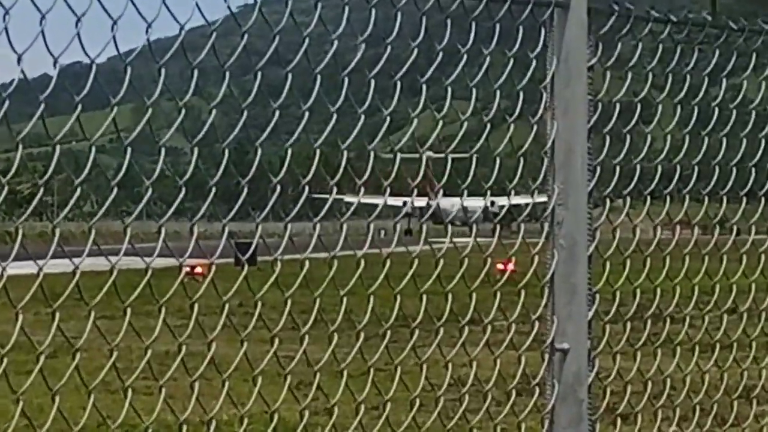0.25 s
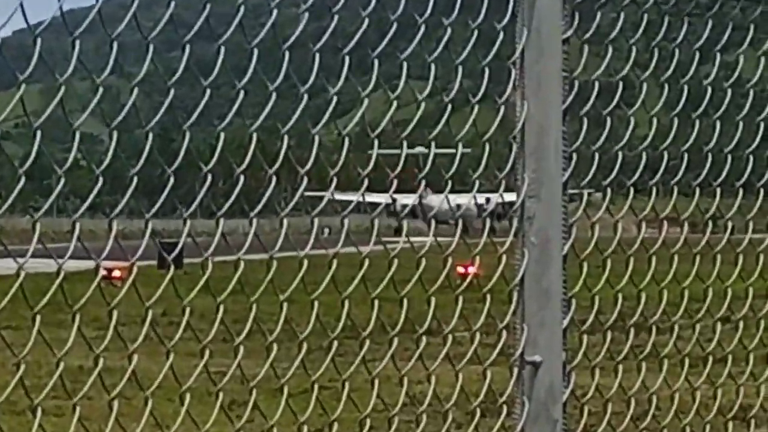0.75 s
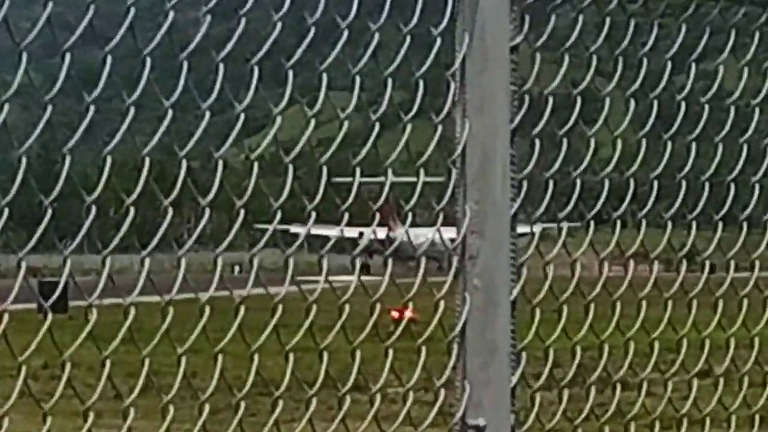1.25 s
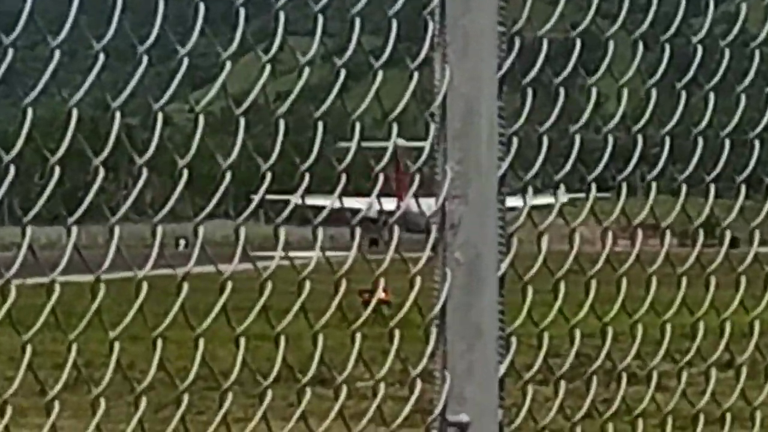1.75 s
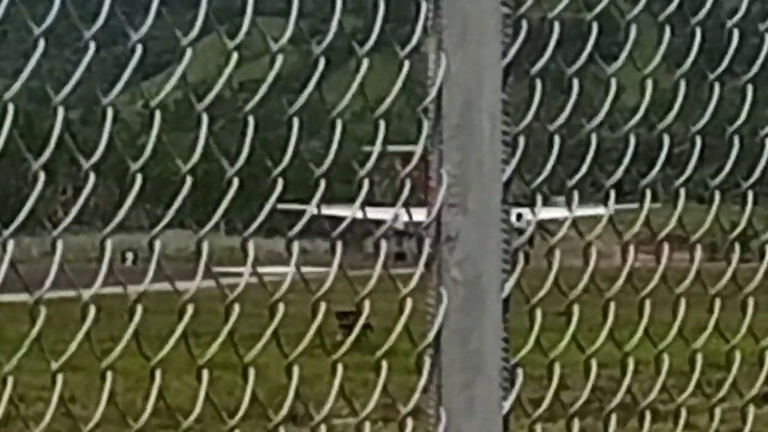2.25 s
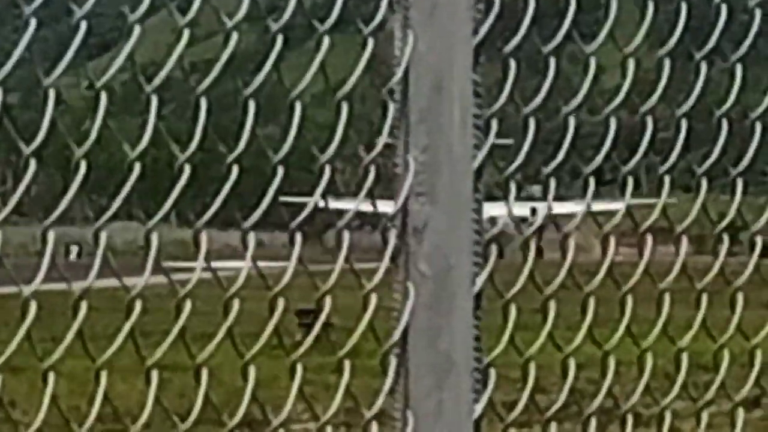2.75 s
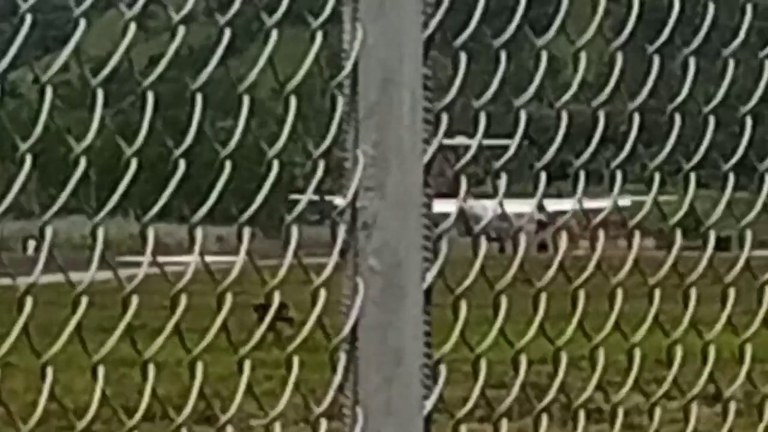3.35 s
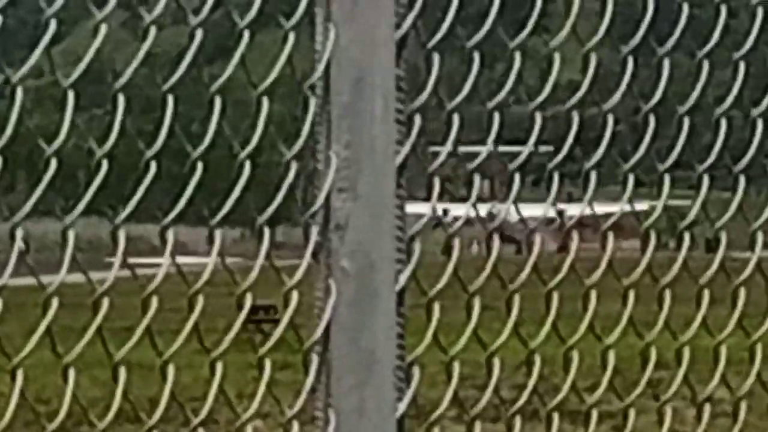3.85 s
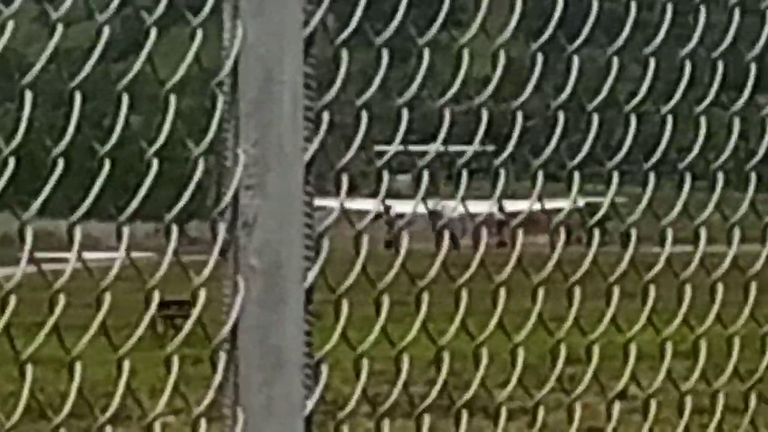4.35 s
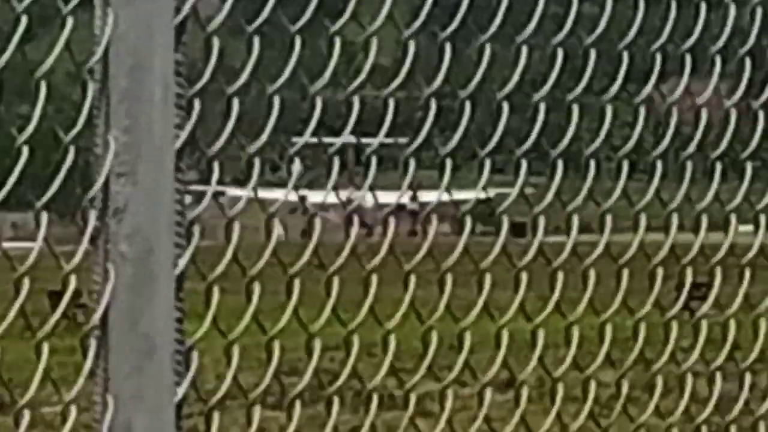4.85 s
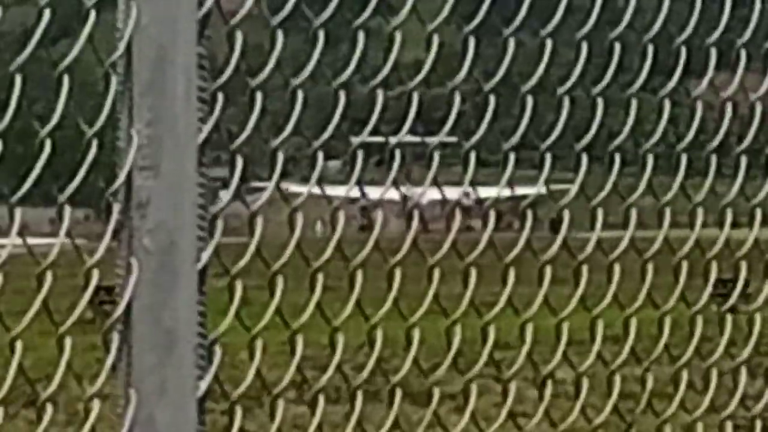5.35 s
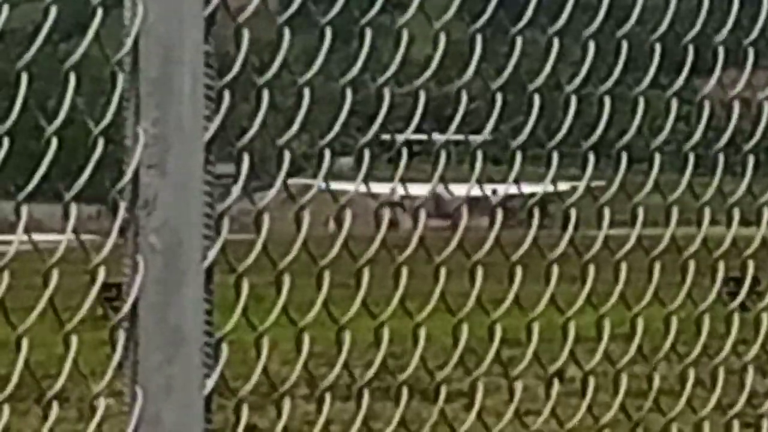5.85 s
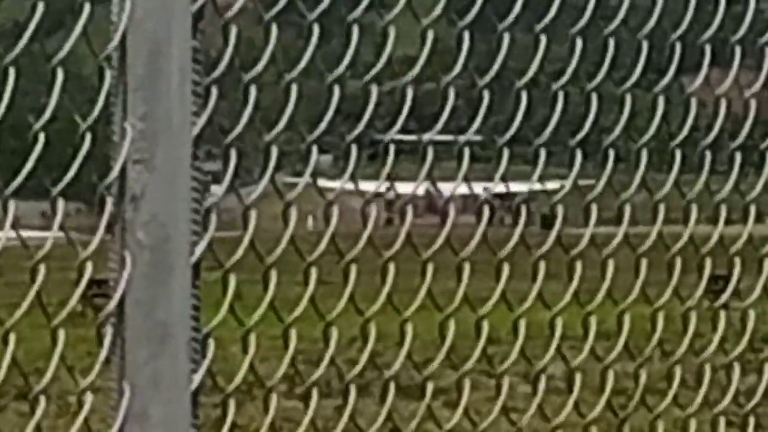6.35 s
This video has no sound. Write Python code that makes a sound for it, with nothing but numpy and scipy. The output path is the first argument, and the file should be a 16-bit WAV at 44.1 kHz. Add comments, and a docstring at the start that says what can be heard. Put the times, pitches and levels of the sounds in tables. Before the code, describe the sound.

An airliner's engines run on a runway, heard outdoors from the airfield fence, starting as a moderate, hissing drone over a faint breeze. At about 0.6 seconds a short gust bumps the microphone. From 1 second the engines swell quickly as the aircraft swings its tail round, reaching a loud peak near 1.8 seconds with a broad roar, a hollow howl and a deep boom. The higher roar drops back first, while the heavy rumble holds until about 2.5 seconds. The sound then slowly weakens and dulls as the aircraft rolls away, settling by about 5 seconds into a steady drone with small low throbs. A small bird gives a few very faint, thin chips, scattered through the first 5 seconds. A faint, wavering distant hum rises briefly at around 6.4 seconds, just before the end.

```python
"""An airliner swings its tail round on the runway and rolls away, heard from behind the airfield fence.
Turbulent mixing in the exhaust radiates noise that is beamed along the jet, so the roar swells as the
jet sweeps past, treble first and rumble last, then dulls with distance. A reflection interferes with
the direct sound and combs the roar. A breeze and one gust rush at the microphone, a small bird chips
faintly in the grass, and a distant hum rises briefly at the end."""
import sys
import numpy as np
from scipy import signal
from scipy.io import wavfile
from scipy.ndimage import uniform_filter1d

SR = 44100
rng = np.random.default_rng(int(sys.argv[2]) if len(sys.argv) > 2 else 0)


def bounce(signal):
    """Save signal as a 16-bit WAV file at the path given by the first command-line argument."""
    frames = np.transpose(np.atleast_2d(signal))
    limited = np.clip(frames, -1, 1)
    pcm = np.round(limited * 32767).astype(np.int16)
    wavfile.write(sys.argv[1], SR, pcm)


N = 290619
TIME = np.arange(N) / SR
TURN_S, TURN_SCALE_S = 1.4, 0.32  # midpoint and time scale of the tail's swing

# Spectral shapes of the noises: frequency_hz, relative_db
BREEZE_SPECTRUM = [(15, -22.5), (36, -20.5), (55, 1.5), (75, 4), (150, -8.5), (400, -21.5), (800, -40),
                   (3000, -120)]
RUMBLE_SPECTRUM = [(11, -46.5), (20, -26.5), (38, -32.5), (50, -26.5), (64, -12), (80, 9.5), (100, 6),
                   (135, 12), (175, 4.5), (215, -7.5), (300, -58), (700, -120)]
BODY_SPECTRUM = [(30, -57.5), (120, -28), (170, -3), (205, -0.5), (255, -3.5), (320, -8.5), (400, -12),
                 (520, -17.5), (900, -60), (2500, -120)]
HISS_SPECTRUM = [(1200, -10.5), (2300, 2.5), (2850, 1), (3100, -3.5), (3500, -6.5), (3900, -7.5),
                 (4400, -12), (5000, -15.5), (5500, -22), (6200, -29.5), (7500, -31.5), (8100, -35)]
ROAR_SPECTRUM = [(200, -19.5), (330, -8), (450, -6), (620, -8), (850, -7.5), (1050, -2), (1340, -2.5),
                 (1700, -4.5), (2000, -5), (2250, -3.5), (2520, -14.5), (2850, -13.5), (3150, -24),
                 (3800, -50.5), (5000, -92)]
# Distant hum: time_s, pitch_hz, level_db
HUM_CURVE = [(6.2, 326, -52.5), (6.29, 313.4, -49), (6.37, 320, -45.5), (6.44, 350, -38.5),
             (6.5, 317.6, -39), (6.56, 306, -55)]
# Bird chips and gust bumps: centre_s, peak_db, pitch_hz, half_length_s
BIRD_CHIPS = [(.135, -57, 5900, .012), (.38, -62.5, 5760, 0.036), (.683, -47, 5970, 0.0039),
              (.84, -55, 5930, .004), (2.42, -56, 5980, 0.005), (2.59, -57, 6050, .006),
              (3.17, -63, 6030, .006), (3.77, -64, 5900, .006), (4.267, -61, 6020, .008),
              (4.316, -72, 5960, 0.0044), (4.644, -63, 5950, 0.0055)]
GUST_BUMPS = [(.586, -40, 100, .012), (.6205, -14, 159, 0.0072), (.627, -31.5, 290, 0.0098),
              (.662, -21, 120, 0.0062)]
# Sweep of the low, beamed sounds past the listener:
# peak_s, peak_db, hold_s, rise_db_per_s, fall_db_per_s, before_db, after_db
RUMBLE_SWEEP = (1.76, -15.5, 0.66, 33.5, 7.8, -35.5, -31)
BODY_SWEEP = (1.8, -19.5, -0.01, 35.5, 8.5, -43.5, -44)
# Brief swells of the rumble: centre_s, gain_db
RUMBLE_SURGES = [(.2, 6), (.27, 11), (.37, 8), (1.85, 4.5), (2.49, 2.5), (3.24, 4.5), (4.24, 5.5),
                 (4.729, 4.5), (5.25, 9), (5.379, 8), (5.78, 4.5), (6.02, 9), (6.55, 6.5)]
# Resonance of the boom, highest in the turn: time_s, pitch_hz
BOOM_PITCH = [(0, 105), (.9, 111), (1.35, 142.4), (1.8, 125.2), (2.2, 111.5), (2.5, 109.4), (3.2, 103.3),
              (3.7, 97.8), (5.4, 98.4), (6.59, 105.6)]
# Part of the rumble's power that lies in the boom: time_s, power_fraction
BOOM_FRACTION = [(0, 0.7), (1, 0.06), (1.7, 0.79), (2.05, 0.3), (2.4, 1), (2.8, 0.4), (3.2, 0.82), (4, 0.4),
                 (6.59, .2)]
# Narrow peaks and notches in the treble: centre_hz, half_width_hz, gain_db
TREBLE_BANDS = [(2870, 210, 1), (3000, 120, -1.5), (3880, 67, -3), (4360, 160, 3.5), (4700, 90, -1.5),
                (4950, 160, 1)]
# Band that the soft grass absorbs, lifted instead far down the runway: time_s, gain_db
GROUND_BAND_GAIN = [(0, -6), (.6, -9), (1, -4), (1.5, -0.5), (2.2, -5.5), (3, -4.5), (4, -4.5), (4.8, -5),
                    (5.5, 4), (6.59, 7)]
# Centre of the hollow howl: time_s, pitch_hz
HOWL_PITCH = [(0, 730), (.5, 794), (.8, 720), (1.15, 750), (1.72, 710), (2.1, 760), (3.1, 759), (4.2, 807),
              (4.8, 775), (6.59, 780)]
# Envelopes of the howl and the broad roar: time_s, relative_db
HOWL_ENVELOPE = [(0, -43.5), (.55, -39.5), (1.15, -30), (1.72, -18), (2.1, -30), (2.75, -34.5),
                 (3.65, -30.5), (4.25, -32), (5.15, -41), (6.0, -37.5), (6.59, -38)]
ROAR_ENVELOPE = [(0, -39.5), (.25, -36), (.72, -35), (1.15, -26), (1.45, -21), (1.78, -19), (2.05, -24.5),
                 (2.25, -24), (3, -30.5), (3.65, -31), (4.3, -36), (4.8, -33.5), (5.4, -35), (5.9, -37.5),
                 (6.59, -38.5)]


def amplitude(db):
    """Amplitude grows tenfold for every 20 dB."""
    return 10 ** (np.asarray(db) / 20)


def unit_rms(x):
    """Normalisation to unit mean power."""
    return x / np.sqrt(np.mean(x ** 2) + 1e-20)


def bell(x, centre, half_width):
    """A Gaussian, falling to 1/e at half_width from its centre."""
    return np.exp(-((x - centre) / half_width) ** 2)


def follow(rows, t):
    """Linear interpolation of a table's columns at times t."""
    times, *columns = np.transpose(rows)
    return [np.interp(t, times, column) for column in columns]


def spectral_gain(spectrum, hz):
    """Interpolation of a spectrum in decibels over log frequency, returned as amplitude."""
    points_hz, db = np.transpose(spectrum)
    return amplitude(np.interp(np.log(hz + 1), np.log(points_hz), db))


def grid(size):
    """Frame times (a column) and bin frequencies of a short-time Fourier transform."""
    hop = size // 4
    return np.arange(N // hop + 5)[:, None] * hop / SR, np.fft.rfftfreq(size, 1 / SR)


def unit_band(gain, hz, low_hz, high_hz):
    """Normalisation of a spectrum so that its noise has unit power within one band."""
    in_band = (hz > low_hz) & (hz < high_hz)
    return gain / np.sqrt(np.mean(gain ** 2 * in_band, axis=-1, keepdims=True))


def shaped_noise(gain):
    """Spectral weighting of white noise by gain (frames x bins)."""
    size = 2 * (gain.shape[1] - 1)
    frames = dict(nperseg=size, noverlap=size - size // 4)
    white = signal.stft(rng.standard_normal(N + 2 * size), **frames)[2][:, :len(gain)]
    return signal.istft(white * gain.T, **frames)[1][:N]


def stationary_noise(spectrum, size):
    """Stationary noise: a constant spectrum, at unit rms."""
    t, hz = grid(size)
    return unit_rms(shaped_noise(spectral_gain(spectrum, hz) * np.ones_like(t)))


def random_field(shape, frames, bins):
    """Moving averages correlate a random field over time and frequency; unit rms."""
    smooth_in_time = uniform_filter1d(rng.standard_normal(shape), frames, axis=0)
    return unit_rms(uniform_filter1d(smooth_in_time, bins, axis=1))


def steadied(x, amount, samples):
    """Envelope compression takes a share of the slow chance swings out of a narrow noise."""
    power = abs(uniform_filter1d(uniform_filter1d(x ** 2, samples), samples)) + 1e-12
    return unit_rms(x / power ** (amount / 2))


def resonate(x, hz, width_hz):
    """A moving resonance by heterodyning: shift hz down to zero, smooth twice, shift back."""
    carrier = np.exp(2j * np.pi * np.cumsum(hz) / SR)
    pole = np.exp(-np.pi * width_hz / SR)
    baseband = signal.lfilter([1], np.poly([pole, pole]), x / carrier)
    return unit_rms((carrier * baseband).real)


def high_pass(x, edge_hz):
    """A fourth-order filter falls 24 dB per octave below its edge."""
    return signal.sosfilt(signal.butter(4, edge_hz, "high", fs=SR, output="sos"), x)


def tone_bursts(rows):
    """Wave packets: one sinusoid under a Gaussian envelope for each row."""
    return sum(amplitude(db) * bell(TIME, centre_s, half_s) * np.sin(2 * np.pi * hz * (centre_s - TIME))
               for centre_s, db, hz, half_s in rows)


def breeze(level_db=-49):
    """Air flowing past the microphone makes faint, steady low-frequency pressure noise."""
    return amplitude(level_db) * stationary_noise(BREEZE_SPECTRUM, size=4096)


def hum():
    """A distant pure tone wavers by frequency modulation: its phase is the integral of its pitch."""
    pitch_hz, level_db = follow(HUM_CURVE, TIME)
    tone = np.sqrt(2) * np.sin(2 * np.pi * np.cumsum(pitch_hz) / SR)
    return amplitude(level_db) * (TIME > HUM_CURVE[0][0]) * tone


def bird(echo_db=-6, t60_s=.25):
    """Scattering from the field gives a bird's thin chips an exponentially decaying tail."""
    t = TIME[:SR // 2]
    tail = rng.standard_normal(len(t)) * amplitude(-60 * t / t60_s)
    chips = tone_bursts(BIRD_CHIPS)
    return chips + amplitude(echo_db) * signal.fftconvolve(chips, tail / np.linalg.norm(tail))[:N]


def gust(rush_db=-30, peak_s=0.638, half_length_s=0.082, centre_hz=170, half_width_hz=130):
    """Pressure fluctuations of a puff on the microphone: a soft rush with a few low bumps."""
    t, hz = grid(size=1024)
    rush = unit_rms(shaped_noise(bell(hz, centre_hz, half_width_hz) * np.ones_like(t)))
    return amplitude(rush_db) * bell(TIME, peak_s, half_length_s) * rush + tone_bursts(GUST_BUMPS)


def turned(t):
    """Source orientation: how far the tail has swung towards the listener, from 0 to 1."""
    return .5 + .5 * np.tanh((t - TURN_S) / TURN_SCALE_S)


def beam_db(t, peak_s, peak_db, hold_s, rise_db_per_s, fall_db_per_s, before_db, after_db):
    """Directivity: the passing jet gives a swell, which adds in power to a drone."""
    approach_db = rise_db_per_s * np.maximum(peak_s - t, 0)
    departure_db = fall_db_per_s * np.maximum(t - peak_s - hold_s, 0)
    swell = amplitude(peak_db - approach_db - departure_db)
    drone = amplitude(before_db + (after_db - before_db) * turned(t))
    return 20 * np.log10(np.hypot(swell, drone))


def throb_db(spread_db=1.5, surge_half_s=0.024):
    """Amplitude modulation of the rumble: random throbbing and a few stronger surges."""
    t, _ = grid(size=4096)
    chance_db = spread_db * random_field(t.shape, frames=2, bins=1)[:, 0]
    surges_db = sum(db * bell(TIME, centre_s, surge_half_s) for centre_s, db in RUMBLE_SURGES)
    return np.interp(TIME, t[:, 0], chance_db) + surges_db


def shimmer(t, hz, patch_db=1., swirl_db=1.33, flutter_db=0.39):
    """Scintillation: moving air on the path varies the gain, over constant treble peaks and notches."""
    shape = len(t), len(hz)
    bands = sum(db * bell(hz, centre, half_width) for centre, half_width, db in TREBLE_BANDS)
    quick_patches = patch_db * random_field(shape, frames=10, bins=7)
    slow_swirl = swirl_db * random_field(shape, frames=55, bins=4)
    flutter = flutter_db * random_field(t.shape, frames=8, bins=1)
    return amplitude(bands + quick_patches + slow_swirl + flutter)


def hiss(gain_db=-12.0, turn_db=-3.5, doubling_db=-1.85, recede_per_s=.5):
    """Fine eddies follow the roar; directivity and distance make their hiss weaker and duller."""
    t, hz = grid(size=1024)
    (roar_db,) = follow(ROAR_ENVELOPE, t)
    distance_doublings = np.log2(1 + recede_per_s * np.maximum(t - TURN_S, 0))
    level_db = roar_db + gain_db + turn_db * turned(t) + doubling_db * distance_doublings
    tilt_db_per_khz = 1.84 - 1.8 * turned(t) - 0.34 * distance_doublings
    treble_tilt = amplitude(tilt_db_per_khz * np.maximum(hz - 3600, 0) / 1000)
    spectrum = unit_band(spectral_gain(HISS_SPECTRUM, hz) * treble_tilt, hz, 3000, 5500)
    return shaped_noise(spectrum * amplitude(level_db) * shimmer(t, hz))


def exhaust_body(gain_db=-0.4):
    """Directivity makes the chesty band of the exhaust strongest when the jet points at the listener."""
    chesty = steadied(stationary_noise(BODY_SPECTRUM, size=2048), amount=0.78, samples=6000)
    return amplitude(beam_db(TIME, *BODY_SWEEP) + gain_db) * chesty


def rumble(gain_db=-1.05, upper_ratio=1.618, upper_db=-7.0):
    """Large eddies radiate low frequencies: broad noise and a boom of two resonances gliding together."""
    level_db = beam_db(TIME, *RUMBLE_SWEEP) + throb_db() + gain_db
    (boom_hz,), (fraction,) = follow(BOOM_PITCH, TIME), follow(BOOM_FRACTION, TIME)
    broad = stationary_noise(RUMBLE_SPECTRUM, size=4096)
    eddies = high_pass(rng.standard_normal(N), edge_hz=65)
    lower = resonate(eddies, boom_hz, width_hz=20)
    upper = amplitude(upper_db) * resonate(eddies, boom_hz * upper_ratio, width_hz=36)
    boom = steadied(lower + upper, amount=1.0, samples=5000)
    mix = np.sqrt(1 - fraction) * broad + np.sqrt(fraction) * boom
    return high_pass(amplitude(level_db) * steadied(mix, amount=0.7, samples=3200), edge_hz=42)


def reflection(hz, delay_s=0.001635, first_peak_hz=125, strength=0.42, fade_hz=2500):
    """Interference of direct and delayed sound makes a comb, which scattering erases in the treble."""
    echo = strength * bell(hz, 0, fade_hz)
    return abs(1 + echo * np.exp(-2j * np.pi * (hz - first_peak_hz) * delay_s))


def ground_effect(t, hz, centre_hz=437, half_width_hz=170):
    """Ground effect: soft grass weakens one band, which is reinforced instead at long range."""
    (band_db,) = follow(GROUND_BAND_GAIN, t)
    return amplitude(band_db * bell(hz, centre_hz, half_width_hz))


def roar(wash_gain_db=-0.5, howl_gain_db=-1.6, howl_half_width_hz=135, howl_skirt_hz=690):
    """Turbulent mixing in the jets radiates a broad wash and a hollow howl, which add in power."""
    t, hz = grid(size=1024)
    (wash_db,) = follow(ROAR_ENVELOPE, t)
    wash = spectral_gain(ROAR_SPECTRUM, hz) * reflection(hz) * ground_effect(t, hz)
    wash = unit_band(wash, hz, 1100, 2800) * amplitude(wash_db + wash_gain_db)
    (howl_db,), (howl_hz,) = follow(HOWL_ENVELOPE, t), follow(HOWL_PITCH, t)
    detuning = (hz - howl_hz) / howl_half_width_hz
    howl = bell(hz, howl_hz, howl_skirt_hz) / np.sqrt(1 + detuning ** 4)
    howl = unit_band(howl, hz, 600, 1000) * amplitude(howl_db + howl_gain_db)
    return shaped_noise(np.hypot(wash, howl) * shimmer(t, hz))


def scene():
    """Superposition of the airliner and the small sounds of the airfield, in mono."""
    airliner = roar() + hiss() + exhaust_body() + rumble()
    return (airliner + breeze() + gust() + bird() + hum())[None]


def record(dry, ceiling=.9, edge_hz=8090):
    """Soft saturation rounds the highest peaks; a low-pass filter then limits the bandwidth."""
    rounded = dry / (1 + (dry / ceiling) ** 6) ** (1 / 6)
    taps = signal.firwin(221, edge_hz, window=("kaiser", 8), fs=SR)
    return signal.oaconvolve(rounded, taps[None], "same")


dry = scene()
out = record(dry)
bounce(out)
```